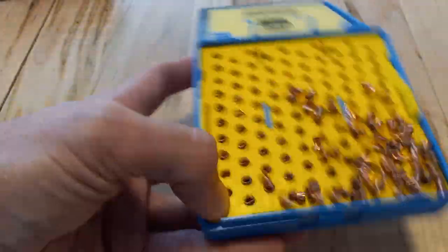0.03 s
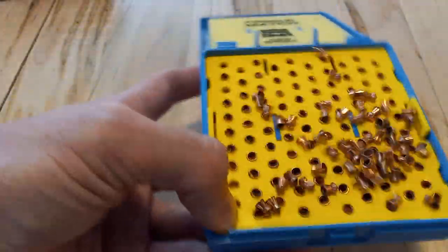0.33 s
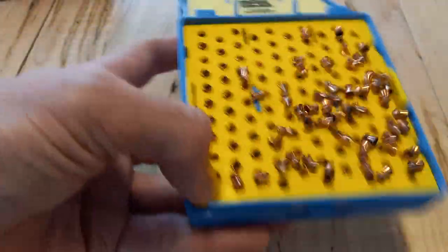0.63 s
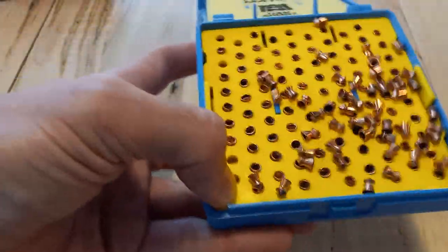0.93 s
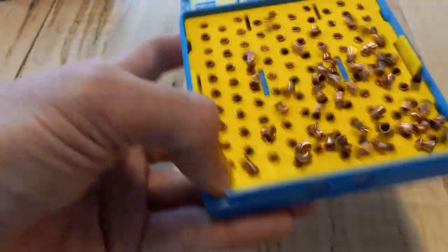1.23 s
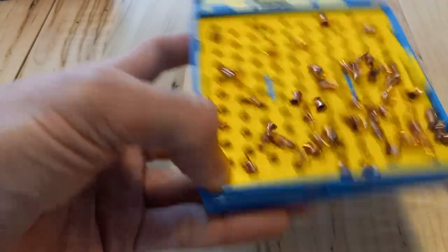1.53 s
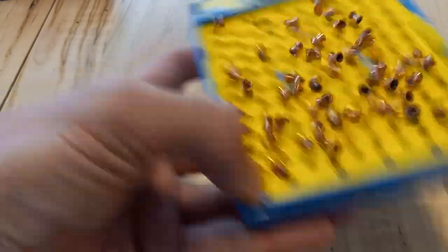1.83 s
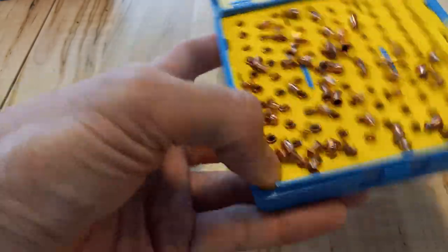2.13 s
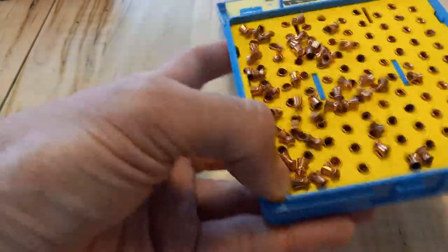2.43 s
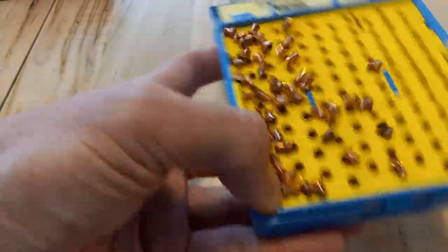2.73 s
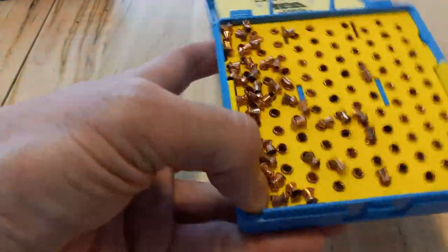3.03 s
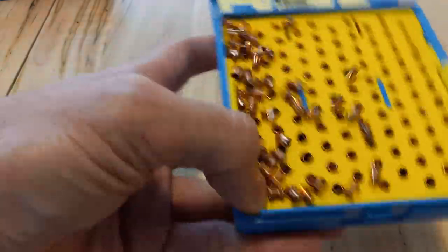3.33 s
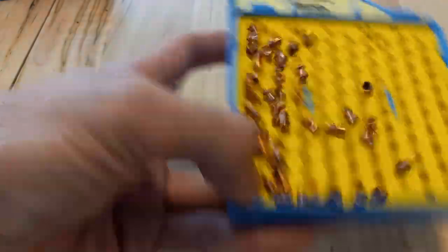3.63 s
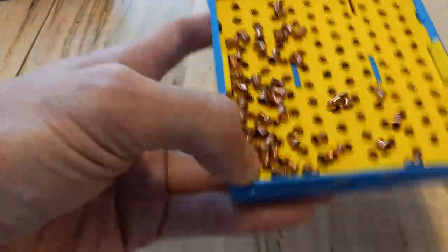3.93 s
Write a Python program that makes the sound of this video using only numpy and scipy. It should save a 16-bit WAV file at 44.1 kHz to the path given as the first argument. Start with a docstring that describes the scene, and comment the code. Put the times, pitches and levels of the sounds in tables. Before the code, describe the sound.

Tiny metal pellets tumble and click in a hand-shaken plastic tray, close by.

```python
"""Small metal pellets rattle in a plastic tray, shaken to and fro by hand, close by in a quiet room.
With each stroke they tumble, clicking on each other and tapping the plastic, thinning out at the turns.
Each contact rings short, dense modes of one place on the tray. Single pellets click, knock or ping
above the rattle. The hand adds faint low bumps and finger rubs."""
import sys
import numpy as np
from scipy import signal
from scipy.fft import rfft, irfft, next_fast_len
from scipy.io import wavfile
from scipy.ndimage import uniform_filter1d, minimum_filter1d

SR = 44100
rng = np.random.default_rng(int(sys.argv[2]) if len(sys.argv) > 2 else 0)


def to_wav(sig):
    """Store sig (one row per channel, or 1-D mono) as 16-bit WAV at the path in sys.argv[1].

    Samples outside -1..1 are clipped; the rate is SR.
    """
    pcm = np.clip(np.atleast_2d(sig), -1, 1) * 32767
    pcm = np.round(pcm).astype(np.int16)
    wavfile.write(sys.argv[1], SR, pcm.T)  # frames by channels


N = 176400
TOP_HZ = 16000


def amp(db):
    """dB to gain."""
    return 10 ** (np.asarray(db) / 20)


def rms(x):
    """Root mean square."""
    return np.sqrt(np.mean(x ** 2) + 1e-20)


def along(points, hz):
    """Interpolate (freq_hz, value) points on a log frequency axis."""
    freq_hz, values = np.transpose(points)
    return np.interp(np.log(hz + 1), np.log(freq_hz + 1), values)


def coloured(x, gain):
    """Minimum-phase filter with magnitude gain(hz)."""
    n = x.shape[-1]
    n_fft = 2 * next_fast_len(n // 2 + 4096)
    magnitude = np.maximum(gain(np.fft.rfftfreq(n_fft, 1 / SR)), 1e-6)
    cepstrum = irfft(np.log(magnitude), n_fft)
    cepstrum[1:n_fft // 2] *= 2
    cepstrum[n_fft // 2 + 1:] = 0
    return irfft(rfft(x, n_fft) * np.exp(rfft(cepstrum)), n_fft)[..., :n]


def equalised(x, colour):
    """Filter by (freq_hz, gain_db) points."""
    return coloured(x, lambda hz: amp(along(colour, hz)))


def add(out, start_s, x):
    """Mix x into out from start_s."""
    part = out[..., max(round(start_s * SR), 0):]
    part[..., :x.shape[-1]] += x[..., :part.shape[-1]]


def tray_rings(count, n_modes=230, rise_s=.0006, hold_s=.0013, tone_spread_db=3):
    """Stereo rings of count places on the tray: same modes, each place favouring its own bands."""
    # mode decay: freq_hz, t60_s
    decay = [(1200, 0.019), (4000, 0.029), (8000, 0.014), (14000, 0.012)]
    # left-right likeness: freq_hz, correlation
    likeness = [(300, 0.36), (700, 1), (1300, 0.93), (2000, 0.84), (2400, 0.086), (3800, 0.24),
                (6000, 0.023)]
    hz = (np.arange(n_modes) + .5) * TOP_HZ / n_modes
    t = np.arange(SR // 32) / SR
    fade = amp(-60 * np.maximum(t - hold_s, 0) / along(decay, hz)[:, None])
    modes = np.cos(2 * np.pi * hz[:, None] * t) * (1 - np.exp(-t / rise_s)) * fade
    modes /= np.linalg.norm(modes, axis=1, keepdims=True)
    tone = uniform_filter1d(rng.standard_normal((count, n_modes)), 7, axis=1)
    weights = rng.standard_normal((2, count, n_modes)) * amp(tone_spread_db * tone / rms(tone))
    mid, side = weights / np.sqrt(np.mean(weights ** 2, axis=1, keepdims=True))
    width_rad = np.arccos(np.clip(along(likeness, hz), -1, 1)) / 2
    mid, side = mid * np.cos(width_rad), side * np.sin(width_rad)
    return np.stack([mid + side, mid - side], axis=1) @ modes


def rattle(places=80):
    """Tumbling contacts, denser with effort: each a plastic tap and a metal tick with a bright edge."""
    # pellets on pellets: time_s, level_db
    clicking = [(0, -22), (.085, -22.5), (.125, -24), (.16, -19.5), (.38, -20.5), (.44, -25), (.55, -21),
                (.65, -19.5), (.78, -22), (.93, -25.5), (1.012, -36), (1.035, -24.5), (1.06, -20),
                (1.09, -27.5), (1.14, -20), (1.3, -21.5), (1.37, -20.5), (1.4, -25.5), (1.48, -22),
                (1.515, -17.5), (1.54, -22), (1.595, -18), (1.64, -23), (1.79, -21.5), (1.82, -29.5),
                (1.89, -19.5), (1.95, -19), (2.0, -21), (2.12, -23.5), (2.16, -24), (2.28, -19.5),
                (2.32, -24), (2.48, -22.5), (2.52, -26.5), (2.62, -22.5), (2.93, -23.5), (2.965, -30.5),
                (3.0, -27), (3.1, -27.5), (3.4, -21), (3.5, -28.5), (3.575, -31), (3.59, -21),
                (3.72, -20.5), (3.9, -21.5), (3.94, -29.5), (4.0, -24.5)]
    # pellets on plastic: time_s, level_db
    drumming = [(0, -22), (.04, -28.5), (.09, -19.5), (.12, -29), (.155, -18.5), (.225, -24.5),
                (.275, -20.5), (.31, -25), (.37, -20.5), (.44, -27), (.56, -20.5), (.62, -23), (.74, -22.5),
                (.78, -26), (.95, -28.5), (1.0, -41), (1.04, -22.5), (1.09, -31), (1.155, -19), (1.24, -24),
                (1.36, -22), (1.4, -26.5), (1.48, -23), (1.51, -21), (1.55, -28.5), (1.6, -20), (1.66, -28),
                (1.69, -19.5), (1.8, -26.5), (1.845, -31.5), (1.89, -18), (1.955, -19), (1.98, -23),
                (2.12, -23), (2.17, -26.5), (2.28, -19), (2.32, -25), (2.48, -24.5), (2.53, -29),
                (2.65, -23.5), (2.77, -25.5), (2.82, -20.5), (2.85, -26), (3.1, -31), (3.39, -23.5),
                (3.43, -26.5), (3.57, -27), (3.74, -20), (3.9, -25), (4, -31.5)]
    # tray radiation, left: freq_hz, gain_db
    tray_left = [(120, -59), (280, -30), (520, -26.5), (700, -15), (900, -8), (1120, -6.5), (1320, 0),
                 (1750, -2.5), (2020, 0.5), (2230, -8), (2700, -4.5), (3300, -8.5), (3780, 1.5),
                 (4500, -6.5), (5550, -1.5), (6500, -10.5), (8000, -14.5), (10000, -21.5), (15800, -25.5)]
    # tray radiation, right: freq_hz, gain_db
    tray_right = [(120, -56), (280, -36), (520, -29), (700, -18), (900, -16), (1320, -3), (1560, -9.5),
                  (1880, -6.5), (2220, 1), (2620, -13), (2980, -2.5), (3400, -8.5), (4000, -4),
                  (4600, -3.5), (6400, -7.5), (7400, -5), (8400, -25), (10200, -19), (15800, -30)]
    contacts_per_s, head_on_per_s = 1300, 67  # contacts: at mean effort
    force_spread_db, band_spread_db = 3, 2
    split_hz, edge_hz = 2430, 8710
    tap_db, tick_db, edge_db = -2.18, -2.46, -11.5

    def below(hz, cutoff_hz):
        return 1 / (1 + (hz / cutoff_hz) ** 12)

    t = np.arange(N) / SR
    effort_db, drum_db = (np.interp(t, *np.transpose(curve)) for curve in (clicking, drumming))
    rate_per_s = contacts_per_s * amp(effort_db - effort_db.mean())
    rings = tray_rings(places)
    place, sign, chance = rng.integers(places, size=N), rng.choice([-1, 1], N), rng.random(N)
    force, *band_scatter = np.clip(rng.standard_normal((4, N)), -2, 2)
    contacts = np.flatnonzero(chance < rate_per_s / SR)
    head_on = chance < head_on_per_s / SR
    force_db = force_spread_db * np.where(head_on, 1, force)
    # level_db, head_on_boost_db, power_share
    bands = ((drum_db + tap_db, 0, lambda hz: below(hz, split_hz)),
             (effort_db + tick_db, 3.5, lambda hz: np.abs(below(hz, edge_hz) - below(hz, split_hz))),
             (effort_db + edge_db, 7, lambda hz: 1 - below(hz, edge_hz)))
    out = np.zeros((2, N))
    for (level_db, boost_db, share), scatter in zip(bands, band_scatter):
        blow_db = level_db + force_db + boost_db * head_on + band_spread_db * scatter
        blows = sign * amp(blow_db) / np.sqrt(rate_per_s)
        band = np.zeros((2, N))
        for i in contacts:
            add(band, i / SR, blows[i] * rings[place[i]])
        for channel, tray in enumerate((tray_left, tray_right)):
            band[channel] = coloured(band[channel], lambda hz: amp(along(tray, hz)) * np.sqrt(share(hz)))
        out += band * rms(amp(level_db)) / rms(band.mean(axis=0))
    return out


def bumps(thud_over_ring_db=6, thud_t60_s=.055):
    """Handling bumps: a dull thud and one low ringing tone each."""
    # bumps of the hand: start_s, level_db, pitch_hz, t60_s
    events = [(0.0, -38.5, 340, 0.42), (0.292, -37, 310, 0.2), (0.406, -42.5, 186, 0.41),
              (1.305, -38.5, 295, 0.13), (1.311, -36, 95, 0.1)]
    # thud spectrum: freq_hz, gain_db
    colour = [(35, -30), (85, 0), (300, -2), (700, -12), (4000, -45)]
    out, t = np.zeros(N), np.arange(SR // 2) / SR
    for start_s, level_db, pitch_hz, t60_s in events:
        thud = equalised(rng.standard_normal(len(t)) * amp(-60 * t / thud_t60_s), colour)
        ring = np.sin(2 * np.pi * pitch_hz * t) * amp(-60 * t / t60_s) * (1 - np.exp(-t * pitch_hz))
        add(out, start_s, amp(level_db) * (amp(thud_over_ring_db) * thud / np.abs(thud).max() + ring))
    return out


def room_noise(level_db=-60.5):
    """Quiet low noise, partly common to both sides."""
    # freq_hz, gain_db
    colour = [(20, -14), (45, -17), (90, 5), (150, 0), (400, -3.5), (15000, -25)]
    noise = equalised(rng.standard_normal((2, N)) + 0.6 * rng.standard_normal(N), colour)
    return amp(level_db) * noise / rms(noise)


def room_tail(x, level_db=-11):
    """Short diffuse reverberation, duller as it dies."""
    # room decay: freq_hz, t60_s
    decay = [(300, 0.56), (3000, 0.26), (12000, 0.065)]
    hz, t, spectra = signal.stft(rng.standard_normal((2, SR // 2)), SR, nperseg=256)
    _, tail = signal.istft(spectra * amp(-60 * t / along(decay, hz)[:, None]), SR, nperseg=256)
    return amp(level_db) * signal.fftconvolve(x, tail / np.linalg.norm(tail[0]), axes=1)[:, :N]


def strikes(events, colour, damping_t60_s):
    """Hard single contacts, each at its own place; extra damping ends them sooner than a tumble."""
    out, rings = np.zeros((2, N)), tray_rings(len(events))
    t = np.arange(rings.shape[-1]) / SR
    rings = equalised(rings * amp(-60 * t / damping_t60_s), colour)
    for (start_s, peak_db), ring in zip(events, rings):
        add(out, start_s, ring * amp(peak_db) / np.abs(ring).max())
    return out


def clicks():
    """Single pellets click sharply."""
    # sharp contacts: start_s, peak_db
    events = [(0.0765, 0.5), (0.466, -9), (0.957, -9.5), (1.0652, -7), (1.1225, -5.5), (1.498, -18),
              (2.127, -2), (2.4434, -8), (2.4785, -2), (2.5769, -11), (2.6771, -9), (2.748, -23),
              (2.9985, -8), (3.0627, -9), (3.2325, -4.5), (3.292, -1.5), (3.3865, -5), (3.493, -9),
              (3.5515, -5.5), (3.5828, -3), (3.679, -2)]
    # click spectrum: freq_hz, gain_db
    colour = [(100, -64), (400, -32), (1200, 8), (3800, 9.5), (7000, 6), (9000, -8.5), (15000, -9.5)]
    return strikes(events, colour, damping_t60_s=.014)


def finger_rubs():
    """Fingers rub the plastic: soft swells of low noise."""
    # rubs: start_s, length_s, level_db
    events = [(0.2, 0.34, -47), (3.01, 0.4, -49.5), (3.47, 0.19, -48.5)]
    # friction spectrum: freq_hz, gain_db
    colour = [(30, -31), (90, -5), (200, -8), (310, 9.5), (1000, -14)]
    t = np.arange(N) / SR
    friction = equalised(rng.standard_normal(N), colour)
    swells = sum(amp(level_db) * np.sin(np.pi * np.clip((t - start_s) / length_s, 0, 1))
                 for start_s, length_s, level_db in events)
    return swells * friction / rms(friction)


def knocks():
    """Single pellets strike the tray hard."""
    # blows on the plastic: start_s, peak_db
    events = [(0.973, -3), (0.9845, -13), (1.028, -11), (1.686, -8), (1.901, -1.5), (2.362, -12),
              (2.4452, -12), (3.302, -8.5), (3.452, -7), (3.714, -7)]
    # knock spectrum: freq_hz, gain_db
    colour = [(100, -43), (700, -21.5), (1200, 9), (2000, -4), (2700, -8.5), (15000, -26)]
    return strikes(events, colour, damping_t60_s=.0092)


def pings(rise_s=.0015, t60_s=.024):
    """Single pellets ring briefly, one high tone each."""
    # pellet rings: start_s, peak_db, pitch_hz
    events = [(1.022, -20, 3030), (1.032, -18, 3850), (1.053, -21, 2960), (2.929, -23, 3860),
              (3.098, -17.5, 3730), (3.233, -13, 3660), (3.388, -15, 3690), (3.607, -13, 3890)]
    out, t = np.zeros((2, N)), np.arange(SR // 20) / SR
    envelope = (1 - np.exp(-t / rise_s)) * amp(-60 * t / t60_s)
    for start_s, peak_db, pitch_hz in events:
        tone = np.sin(2 * np.pi * (pitch_hz * t + rng.random((2, 1)) / 2))
        add(out, start_s, amp(peak_db) * envelope / envelope.max() * tone)
    return out


def heap_slide(x, dip_hz=4850, width_hz=340, dip_db=-4.5):
    """The heap crosses to the far wall and damps one tray band; the sound drifts slightly right."""
    # start and end of the crossing: time_s, left_over_right_db
    crossing = [(1.5, 0.76), (2.7, -0.86)]
    times_s, pans_db = np.transpose(crossing)
    t = np.arange(N) / SR
    across, pan_db = np.interp(t, times_s, [0, 1]), np.interp(t, times_s, pans_db)
    hollow = coloured(x, lambda hz: amp(dip_db * np.exp(-((hz - dip_hz) / width_hz) ** 2)))
    return (x + across * (hollow - x)) * amp([pan_db / 2, -pan_db / 2])


def scene():
    """Pellets in the moving tray, the hand and the room."""
    pellets = heap_slide(rattle() + pings() + clicks() + knocks())
    return pellets + room_tail(pellets) + bumps() + finger_rubs() + room_noise()


def record(dry, limiter_s=.003):
    """Fast peak limiter at full scale, then a low-pass at TOP_HZ."""
    n_fft, span = next_fast_len(N + SR // 2), round(limiter_s * SR)
    needed_gain = 1 / np.maximum(np.abs(dry).max(axis=0), 1)
    gain = uniform_filter1d(minimum_filter1d(needed_gain, span), span)
    passband = np.fft.rfftfreq(n_fft, 1 / SR) < TOP_HZ
    return irfft(rfft(dry * gain, n_fft) * passband, n_fft)[:, :N]


dry = scene()
out = record(dry)
to_wav(out)
```